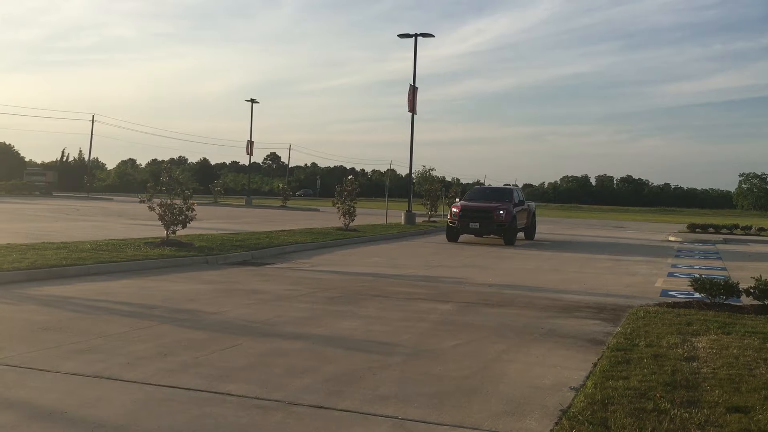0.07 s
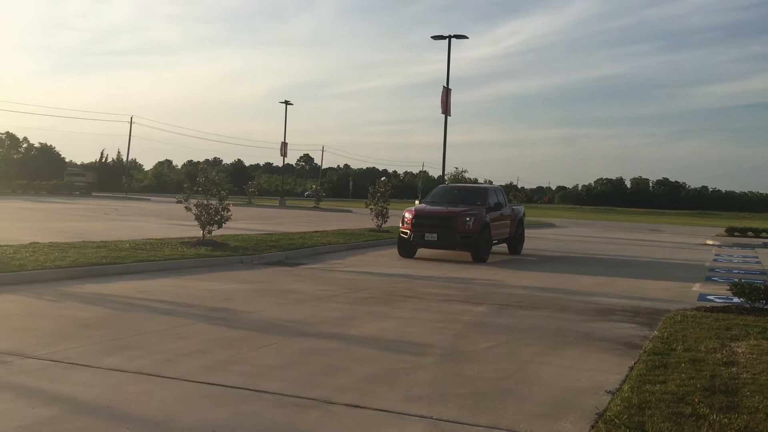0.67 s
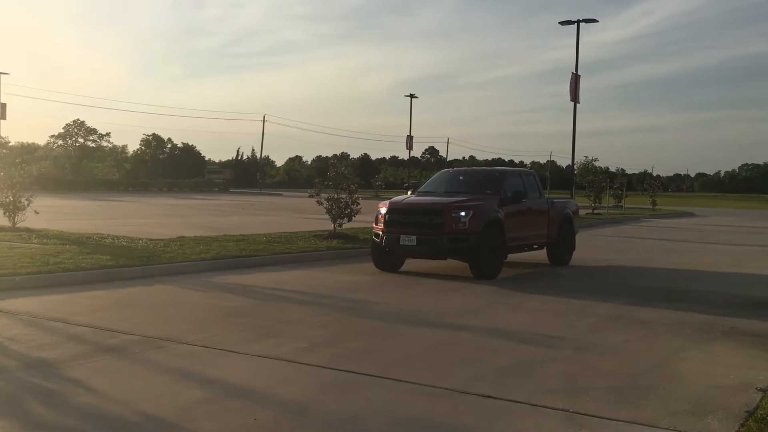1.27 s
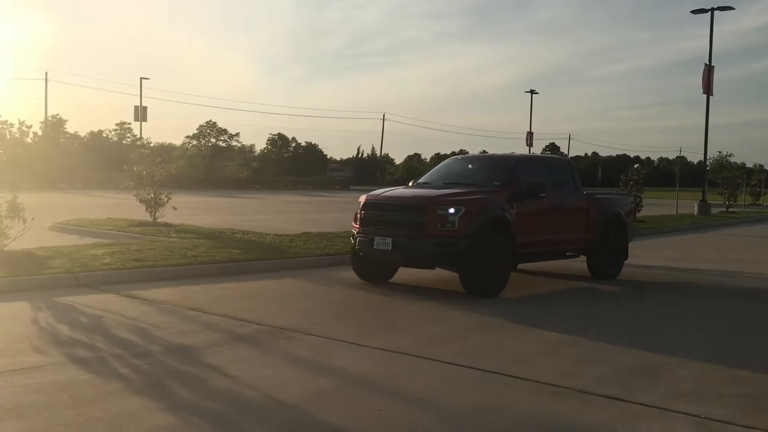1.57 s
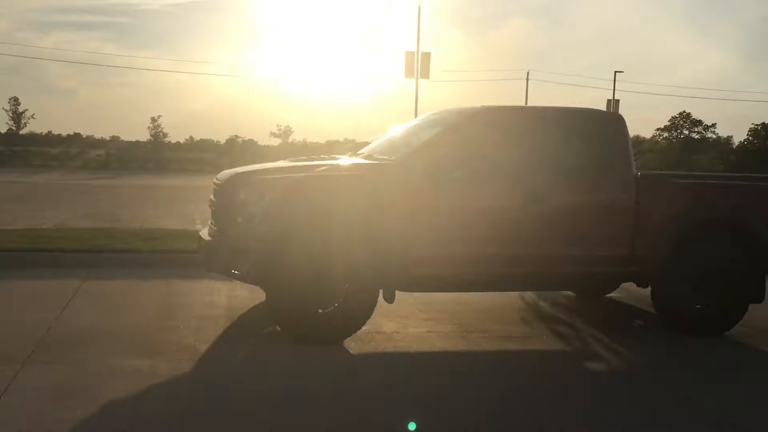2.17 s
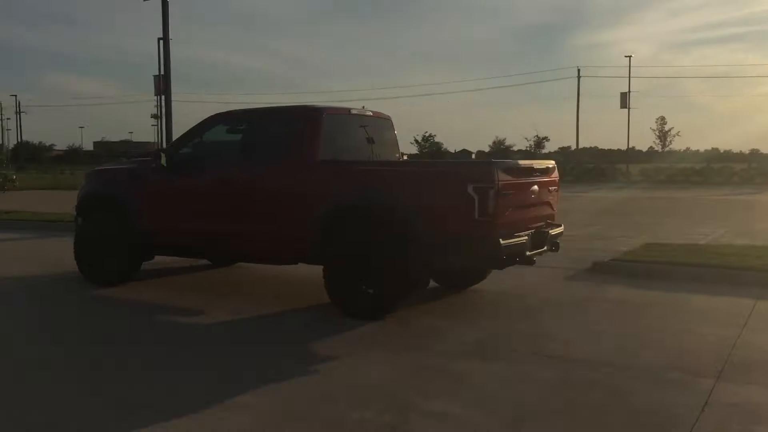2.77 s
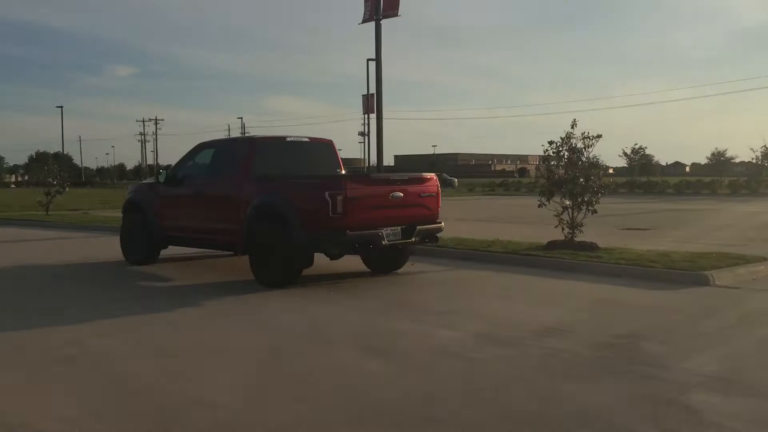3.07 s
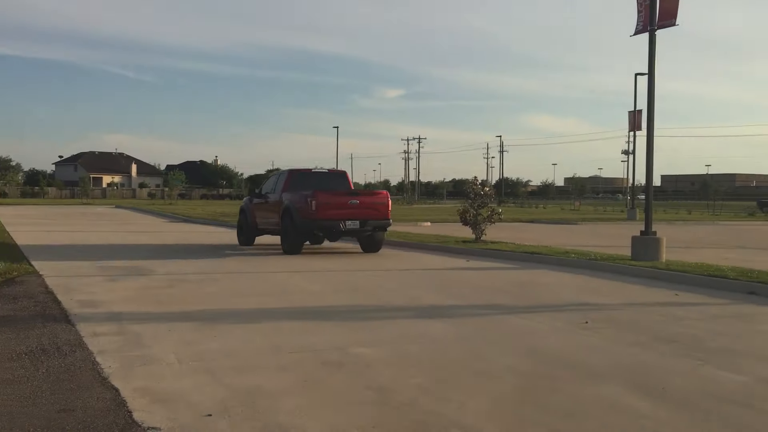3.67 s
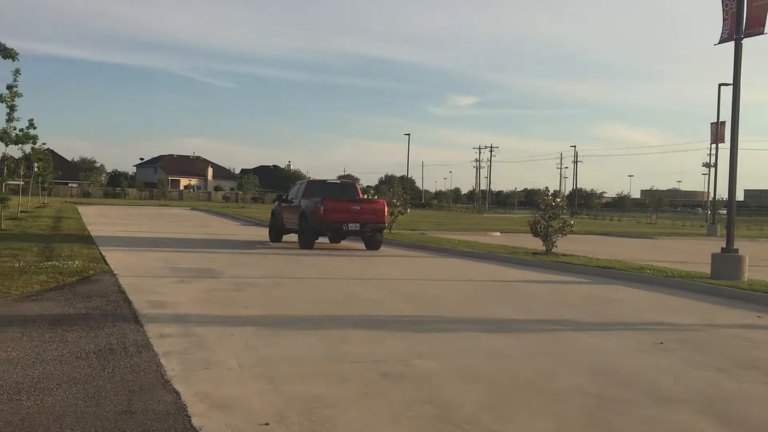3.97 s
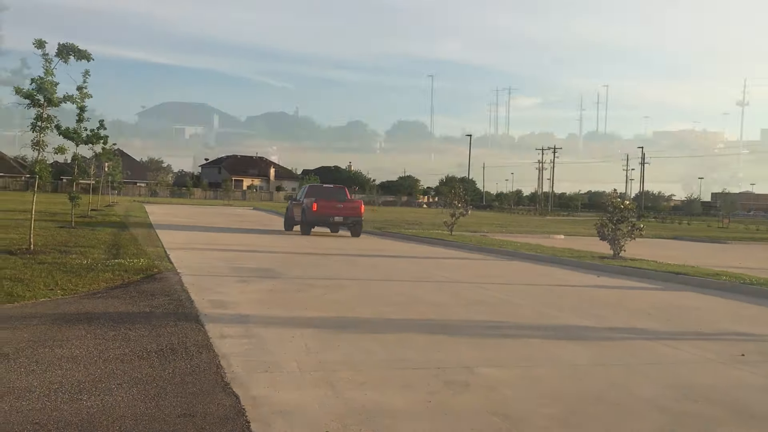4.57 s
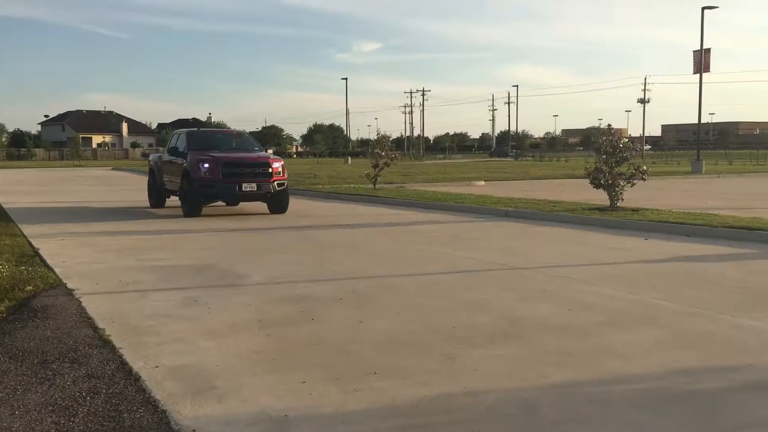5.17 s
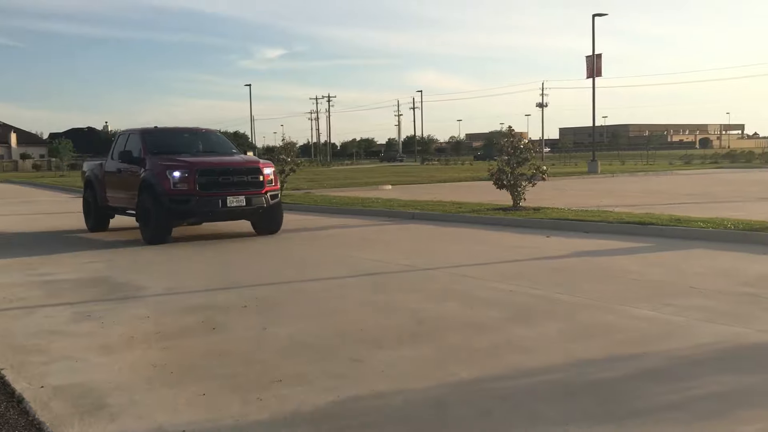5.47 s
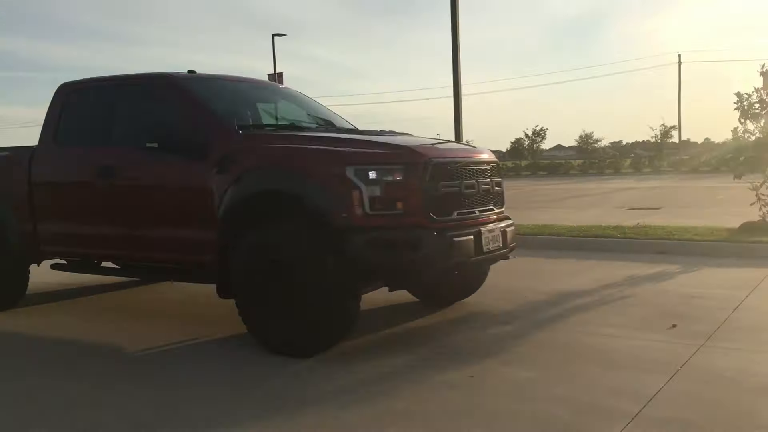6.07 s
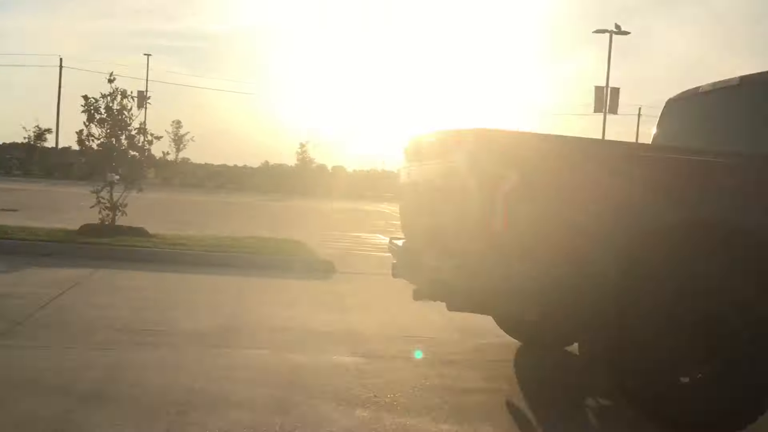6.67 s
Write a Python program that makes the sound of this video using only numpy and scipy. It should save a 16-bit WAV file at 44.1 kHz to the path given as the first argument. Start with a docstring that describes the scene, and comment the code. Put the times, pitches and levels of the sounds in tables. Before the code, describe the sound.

A pickup truck approaches across an open concrete lot, its engine rumble building over the roar of its tyres. It passes close with a thump and a brief buffet of wind on the microphone, then the turbo valve releases a sudden hiss that fades as it moves away. The truck approaches again, revving a little higher, and lets out a second, louder hiss as it rolls by.

```python
"""Open concrete lot: a twin-turbo V6 pickup accelerates past twice, one pass fading into the next.
The exhaust's crank orders climb over the roar of knobbly tyres and the turbos whistle up to speed.
Each time the throttle shuts, the blow-off valve dumps the boost in a sudden hiss.
Tyres slap over slab joints; the truck's wake buffets the small mono microphone."""
import sys
import numpy as np
from scipy.fft import rfft, irfft, next_fast_len
from scipy.io import wavfile

SR = 44100
rng = np.random.default_rng(int(sys.argv[2]) if len(sys.argv) > 2 else 0)


def generate_wav(signal):
    """Clip the signal to [-1, 1] and save it as 16-bit WAV at the path in sys.argv[1]."""
    frames = np.transpose(np.atleast_2d(signal))
    scaled = np.clip(frames, -1, 1) * 32767
    pcm = np.round(scaled).astype(np.int16)
    wavfile.write(sys.argv[1], SR, pcm)


N = 300762


def from_db(db):
    """Decibels to gain."""
    return 10 ** (np.asarray(db) / 20)


def rms_one(x):
    """Scale to rms 1."""
    return x / np.sqrt(np.mean(x ** 2) + 1e-20)


def clock():
    """Sample times in s."""
    return np.arange(N) / SR


def in_time(curve):
    """Interpolate (t/s, value) rows at every sample."""
    return np.interp(clock(), *np.transpose(curve))


def filtered(x, response):
    """Apply a gain given as a function of f/Hz."""
    size = next_fast_len(N + 4096)
    hz = np.maximum(np.arange(size // 2 + 1) * SR / size, 1)
    return irfft(rfft(x, size) * response(hz), size)[..., :N]


def turbulence(spectrum):
    """Noise shaped by (f/Hz, density/dB) rows; rms 1."""
    points_hz, db = np.transpose(spectrum)

    def response(hz):
        return from_db(np.interp(np.log(hz), np.log(points_hz), db, left=-90, right=-90))
    return rms_one(filtered(rng.standard_normal(N), response))


def drift(rate_hz):
    """Smooth random motion up to about rate_hz; rms 1."""
    coarse_s = clock()[::16]
    hz = np.arange(len(coarse_s) // 2 + 1) / coarse_s[-1]
    white = rng.standard_normal(len(coarse_s))
    slow = irfft(rfft(white) / (1 + (hz / rate_hz) ** 4), len(coarse_s))
    return np.interp(clock(), coarse_s, rms_one(slow))


def narrow_noise(centre_hz, width_hz):
    """Breathy tone round a steady or moving centre; rms 1."""
    phase = 2 * np.pi * np.cumsum(centre_hz * np.ones(N)) / SR
    return drift(width_hz) * np.cos(phase) + drift(width_hz) * np.sin(phase)


def swell(peak_s, sigma_s):
    """Gaussian envelope."""
    return np.exp(-0.5 * np.minimum(((clock() - peak_s) / sigma_s) ** 2, 100))


def peaks_db(peaks, hz):
    """Summed bell curves (f/Hz, width/Hz, gain/dB) at hz."""
    return sum(db * np.exp(-2 * np.minimum(((hz - centre_hz) / width_hz) ** 2, 20))
               for centre_hz, width_hz, db in peaks)


def second_pass(midpoint_s=4.75, fade_s=0.186):
    """Share of the second pass, 0 to 1."""
    return np.clip((clock() - midpoint_s) / fade_s + 0.5, 0, 1)


def drive(reference_m=4):
    """Truck state: distance gain/dB, load, bearing (-1 approaching, 1 receding)."""
    passes = [(2.45, 9, 4.0), (6.351, 9, 3.3)]  # abreast t/s, speed/(m/s), closest distance/m
    throttle = [(0, 0.33), (1.05, 0.5), (1.55, 0.45), (2.15, 0.79), (2.4, 0.92), (3.04, 0.88), (3.2, 0.22),
                (4.6, 0.16), (4.85, .37), (5.45, 0.74), (5.7, 1), (5.97, 1), (6.2, 0.77), (6.28, .16),
                (6.82, 0.16)]  # t/s, load 0-1
    second = second_pass()
    distance_m, bearing = 0, 0
    for share, (abreast_s, speed_m_s, closest_m) in zip((1 - second, second), passes):
        along_m = speed_m_s * (clock() - abreast_s)
        range_m = np.hypot(along_m, closest_m)
        distance_m += share * range_m
        bearing += share * along_m / range_m
    return -20 * np.log10(distance_m / reference_m), in_time(throttle), bearing


def heard(truck, db, spreading, shut_loss_db, behind_db):
    """Source gain by distance, load and bearing; spreading 1 is the 1/r law."""
    near_db, load, bearing = truck
    return from_db(db + spreading * near_db - shut_loss_db * (1 - load) + behind_db * bearing)


def exhaust(truck, turns, crank_hz, waver_db=1.82, roughness=0.53):
    """Crank orders swell and dip as the revs change; uneven combustion shakes the rasp."""
    # clean orders: order, level/dB, spreading, shut-throttle loss/dB, gain from behind/dB
    low_orders = [(1, -40.5, 0.019, 7, 2), (2, -30, 0.34, 27.5, -3.2), (3, -27.5, 0.59, 17, 1.3),
                  (4, -29, 0.32, 39, 3.2), (5, -25, 1.05, 38.5, 1.5)]
    rasp_orders = [(1.5, -16), (2.5, -19), (3.5, -12.5), (4.5, -1.5), (5.5, -6.5), (6, 0.5), (6.5, -9),
                   (7, 1), (7.5, -16), (8, -4.5), (9, -5.5), (9.5, -19), (10, -9), (11, -27), (12, -19)]  # order, level/dB
    peaks = [(66.7, 2.3, 9), (80.27, 14.3, 20), (116.3, 7.3, 3), (132.3, 15, 6.5), (197.2, 8.5, 9.5),
             (209, 3.6, 4.5), (242.5, 29, 5), (274.4, 7.4, 5.5), (350.7, 24, 7), (569, 32, 11.5)]  # narrow peaks imitating ground-reflection interference: f/Hz, width/Hz, gain/dB
    low, rasp = np.zeros((2, N))
    for order, *level in low_orders:
        gain = heard(truck, *level) * from_db(peaks_db(peaks, order * crank_hz) + waver_db * drift(6.9))
        low += gain * np.sin(2 * np.pi * (order * turns + rng.random()))
    for order, db in rasp_orders:
        gain = from_db(db + peaks_db(peaks, order * crank_hz)) * (1 + roughness * drift(25))
        rasp += gain * np.sin(2 * np.pi * (order * turns + rng.random()))
    rasp *= heard(truck, db=-36, spreading=0.92, shut_loss_db=21.5, behind_db=5)
    return np.sqrt(2) * (low + rasp)


def tyres(truck, firing, throb=0.13, flutter_db=1.0):
    """Tread blocks pump air on concrete; the engine's beat ripples the upper roar."""
    hollow_spectrum = [(100, -3.5), (250, -3.5), (350, -11), (440, -11.5), (540, -4.5), (700, 3),
                       (840, -3.5), (1050, -22), (2000, -48)]  # f/Hz, density/dB
    tread_spectrum = [(500, -31), (820, -8.5), (1020, 2), (1200, 0.5), (1420, -2), (1700, -8),
                      (2200, -13.5), (4000, -41.5)]  # f/Hz, density/dB
    scrub_spectrum = [(1000, -50), (1500, 6), (1800, 2), (2200, -2.5), (2700, -12), (3500, -26),
                      (7000, -50)]  # f/Hz, density/dB
    tread_levels = [(0, -39), (1.18, -38.5), (1.33, -31), (1.55, -32.5), (1.7, -29), (2.35, -27),
                    (2.92, -24.5), (3.05, -30), (4, -34.5), (4.7, -37.5), (5.05, -30.5), (5.15, -27.5),
                    (5.55, -25), (5.93, -22), (6.15, -28), (6.82, -28.5)]  # slab to slab: t/s, level/dB
    near_db, _, bearing = truck
    song_hz = 1250.4 + 11 * near_db - 65.04 * bearing  # sinks as the truck recedes
    song = from_db(-6) * narrow_noise(song_hz, width_hz=150)
    tread = from_db(in_time(tread_levels)) * rms_one(turbulence(tread_spectrum) + song)
    hollow = turbulence(hollow_spectrum)
    hollow *= heard(truck, db=-26.5, spreading=0.68, shut_loss_db=7.5, behind_db=0.6)
    scrub = turbulence(scrub_spectrum)
    scrub *= heard(truck, db=-31, spreading=0.8, shut_loss_db=10.5, behind_db=2.7)
    return hollow + (tread + scrub) * (1 + throb * firing) * from_db(flutter_db * drift(26))


def chassis(truck):
    """Low rumble of the rolling chassis."""
    spectrum = [(20, -34), (40, 1.5), (60, 5), (110, 4), (200, 4.5), (300, -2.5), (420, -8), (900, -50)]  # f/Hz, density/dB
    return heard(truck, db=-29.5, spreading=0.75, shut_loss_db=4.5, behind_db=1) * turbulence(spectrum)


def air_rush(truck, firing, throb=0.045, flutter_db=0.75):
    """Intake and wheel-arch rush plus inlet-duct ring, pulsing with the cylinders."""
    rush_spectrum = [(1500, -28), (2600, -2.5), (3400, -3), (4300, -1.5), (5500, -2.5), (6500, -2.5),
                     (8000, -10), (11000, -28), (16000, -38)]  # f/Hz, density/dB
    sizzle_spectrum = [(3000, -22), (5000, -1), (6600, -7), (8000, 1), (9500, -1), (11500, -5),
                       (13000, -12), (16000, -28)]  # f/Hz, density/dB
    fine_spectrum = [(9500, -25), (11500, -4), (12500, 1), (14000, -1), (16000, -3)]  # finest hiss, close range only: f/Hz, density/dB
    duct_modes = [(6660, 915, -3), (9900, 479, -14)]  # f/Hz, width/Hz, level/dB
    rush = turbulence(rush_spectrum)
    rush *= heard(truck, db=-37.5, spreading=1.19, shut_loss_db=5, behind_db=3.2)
    sizzle = turbulence(sizzle_spectrum)
    sizzle *= heard(truck, db=-40, spreading=0.78, shut_loss_db=18.5, behind_db=3.5)
    fine = turbulence(fine_spectrum)
    fine *= heard(truck, db=-46, spreading=2, shut_loss_db=17, behind_db=-2)
    ring = sum(from_db(db) * narrow_noise(hz, width_hz) for hz, width_hz, db in duct_modes)
    ring *= heard(truck, db=-40, spreading=1.5, shut_loss_db=33, behind_db=-4)
    return (rush + sizzle + fine + ring) * (1 + throb * firing) * from_db(flutter_db * drift(60))


def blow_off(opening_s=0.016, afterflow_rise_s=0.36, flutter_db=0.24):
    """The valve's jet weakens and dulls as boost drains; the coasting compressor blows on softly."""
    # opens t/s, level/dB, fall/(dB/s), shuts after/s, extra fall/(dB/s), edge level/dB,
    # edge decay/(1/s), afterflow level/dB, afterflow fall/(dB/s); the first opens before t = 0
    vents = [(-.55, -19.5, 32, 0.63, 21, -1.5, 1.9, -29.5, 12),
             (2.909, -18.5, 29.5, 0.4, 22, -3, 2.4, -24, 19.5),
             (6.011, -15, 17.5, .35, 72, -2.8, 0.97, -17.5, 13)]
    jet_spectrum = [(700, -31), (1500, 3), (2200, 1.5), (3000, 0.5), (3800, -2.5), (4800, 1.5), (5700, 5),
                    (6600, 5.5), (7600, 2.5), (9200, -1.5), (12000, -5.5), (16000, -29)]  # f/Hz, density/dB
    edge_spectrum = [(3000, -32), (5500, -40), (6600, 4.5), (8000, 1), (9400, 4.5), (11000, 1), (13000, 1),
                     (16000, -1)]  # the jet's bright edge: f/Hz, density/dB
    afterflow_spectrum = [(1200, -1), (2100, 3), (2700, -2.5), (3500, 0), (5500, 0.5), (6600, -1.5),
                          (8000, -3), (9500, -5), (11500, -8.5), (13000, -11.5), (16000, -16)]  # f/Hz, density/dB
    echoes = [(.00097, -33), (.0034, -19.5)]  # off truck and concrete: delay/s, level/dB
    jet, edge, afterflow = np.zeros((3, N))
    for opens_s, db, fall, shuts_s, extra_fall, edge_db, dulling, after_db, after_fall in vents:
        age_s = np.maximum(clock() - opens_s, 0)
        lift = 1 - np.exp(-(age_s / opening_s) ** 2)
        flow = lift * from_db(db - fall * age_s - extra_fall * np.maximum(age_s - shuts_s, 0))
        jet += flow
        edge += flow * from_db(edge_db) * np.exp(-dulling * age_s)
        rise = 1 - np.exp(-(age_s / afterflow_rise_s) ** 2)
        afterflow += rise * from_db(after_db - after_fall * age_s)

    def comb(hz):
        return 1 + sum(from_db(db) * np.exp(-2j * np.pi * hz * delay_s) for delay_s, db in echoes)
    hiss = jet * turbulence(jet_spectrum) + edge * turbulence(edge_spectrum)
    hiss *= from_db(flutter_db * drift(55))
    return filtered(hiss, comb) + afterflow * turbulence(afterflow_spectrum)


def lot(first_db=-54.5, second_db=-62):
    """Faint ambient hiss, quieter in the second pass."""
    spectrum = [(2500, -8), (3300, 5), (5000, -6), (6500, 6), (9000, -3), (11500, -10), (13000, -14),
                (16000, -26)]  # f/Hz, density/dB
    return from_db(first_db + (second_db - first_db) * second_pass()) * turbulence(spectrum)


def wake(wander=0.301, eddies_db=-2.5):
    """Lumps of air hit the microphone port: a few uneven swings each, finer eddies inside."""
    buffets = [(0.549, -47, 0.034, 55.7), (0.885, -37, 0.017, 75), (2.67, -22, 0.017, 108.3),
               (2.736, -18, .02, 85.2), (2.71, -29, 0.1, 42.2), (3.186, -19, 0.021, 62.2),
               (3.311, -24, 0.023, 69), (6.232, -40, 0.022, 54), (6.478, -23, 0.018, 65.53)]  # t/s, level/dB, sigma/s, swing f/Hz
    eddy_spectrum = [(20, -32), (36, -24), (60, -16), (100, -3), (150, -15), (300, -18.5), (800, -44)]  # f/Hz, density/dB
    uneven_s = np.cumsum(1 + wander * drift(35)) / SR
    eddies = from_db(eddies_db) * turbulence(eddy_spectrum)
    out = np.zeros(N)
    for peak_s, db, sigma_s, hz in buffets:
        swing = np.sin(2 * np.pi * (hz * uneven_s + rng.random()))
        out += from_db(db) * swell(peak_s, sigma_s) * (swing + eddies)
    return out


def turbo(climb_hz_s=12300, climb_db_s=54, sag_hz_s2=2800, sag_db_s=13):
    """The compressor blades' airy whistle climbs, tops out, then sags and fades."""
    spools = [(2.32, 15400, -45), (5.68, 17000, -57)]  # top of each climb: t/s, f/Hz, level/dB
    out = np.zeros(N)
    for top_s, top_hz, db in spools:
        before_s, after_s = np.maximum(top_s - clock(), 0), np.maximum(clock() - top_s, 0)
        hz = np.maximum(top_hz - climb_hz_s * before_s - sag_hz_s2 * after_s ** 2, 0)
        gain = from_db(db - climb_db_s * before_s - sag_db_s * after_s)
        out += gain * narrow_noise(hz, width_hz=400)
    return out


def joint_slaps(attack_s=0.0013):
    """Tyres strike slab joints: short bursts of band noise."""
    slaps = [(2.696, -10, 250, 0.016), (4.027, -26.5, 684, 0.019), (5.886, -18, 1324, .006),
             (5.908, -17.5, 1202, 0.018)]  # t/s, level/dB, f/Hz, decay/s
    out = np.zeros(N)
    for hit_s, db, hz, decay_s in slaps:
        age_s = np.maximum(clock() - hit_s, 0)
        envelope = (1 - np.exp(-age_s / attack_s)) * np.exp(-age_s / decay_s)
        out += from_db(db) * envelope * narrow_noise(hz, width_hz=0.29 * hz)
    return out


def valve_seep():
    """Thin hiss as the blow-off valve starts to lift."""
    seeps = [(2.885, 11850, -46, 0.025), (5.996, 11700, -37, 0.023)]  # t/s, f/Hz, level/dB, sigma/s
    return sum(from_db(db) * swell(peak_s, sigma_s) * narrow_noise(hz, width_hz=1000)
               for peak_s, hz, db, sigma_s in seeps)


def scene():
    """The crank drives the exhaust and ripples tyres and air; both channels are alike."""
    crank_speed = [(0, 57.53), (.85, 56.8), (1.2, 60), (1.55, 59.84), (1.78, 64.73), (2.18, 65.66),
                   (2.32, 69.13), (2.5, 69.3), (2.78, 72.55), (3.08, 66.8), (3.7, 67.05), (4.62, 65.33),
                   (4.72, 70.9), (5.05, 70.94), (5.42, 73.3), (5.68, 77.94), (5.82, 77.96), (5.95, 81.4),
                   (6.09, 75), (6.82, 77.3)]  # t/s, f/Hz
    truck = drive()
    crank_hz = in_time(crank_speed)
    turns = np.cumsum(crank_hz * (1 + 0.0022 * drift(24.5))) / SR
    firing = np.cos(2 * np.pi * 3 * turns)  # V6: three firings a turn
    engine = exhaust(truck, turns, crank_hz)
    rolling = tyres(truck, firing) + chassis(truck) + joint_slaps()
    intake = air_rush(truck, firing) + turbo()
    valve = blow_off() + valve_seep()
    return np.tile(engine + rolling + intake + valve + wake() + lot(), (2, 1))


def record(dry, low_cut_hz=27, high_cut_hz=15780, edge_hz=150):
    """Small microphone: deepest bass shed, treble rippled by the port, top cut steeply."""
    port = [(5000, 920, -3), (7690, 980, -3.5), (10400, 550, -4), (9050, 780, 0.5), (5440, 180, 2.5),
            (6560, 360, -0.5), (11150, 400, 1), (2480, 290, -0.5)]  # peaks and notches: f/Hz, width/Hz, gain/dB
    coloured = filtered(dry, lambda hz: from_db(peaks_db(port, hz)) / np.hypot(1, (low_cut_hz / hz) ** 4))
    return filtered(coloured, lambda hz: np.clip((high_cut_hz - hz) / edge_hz + 0.5, 0, 1))


dry = scene()
out = record(dry)
generate_wav(out)
```